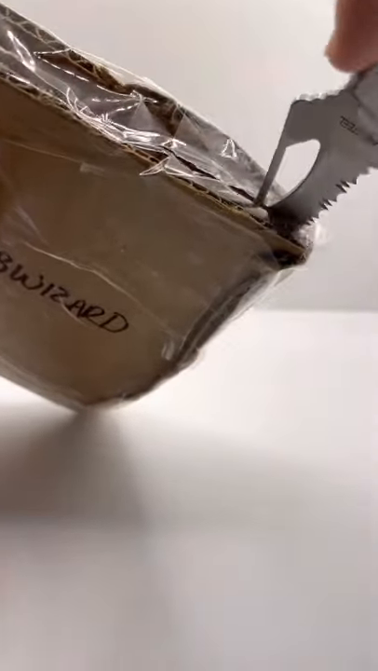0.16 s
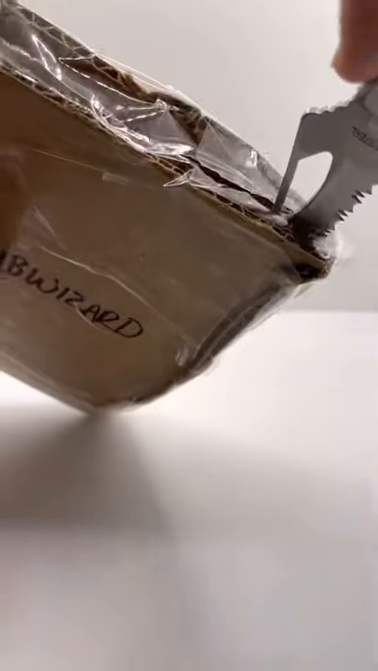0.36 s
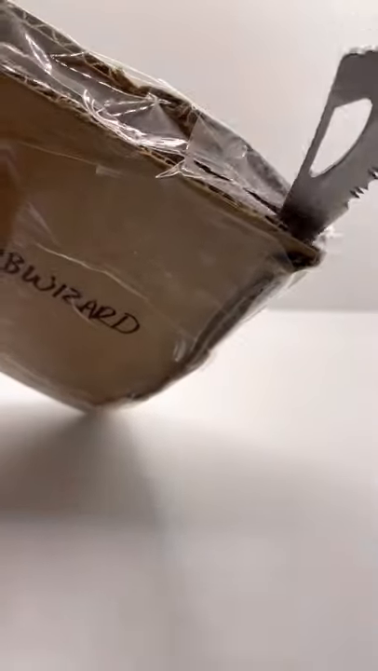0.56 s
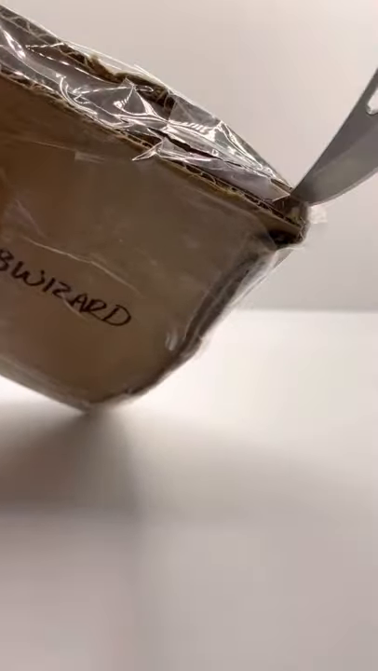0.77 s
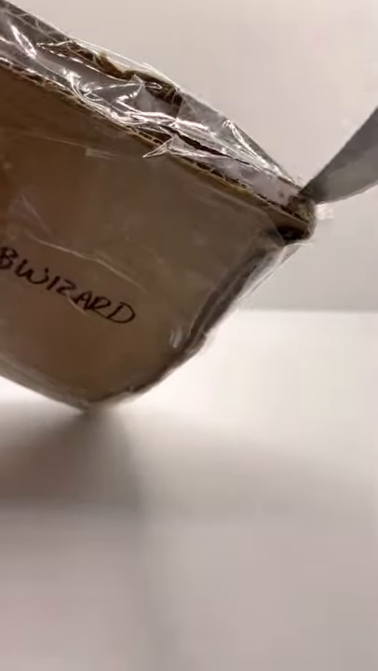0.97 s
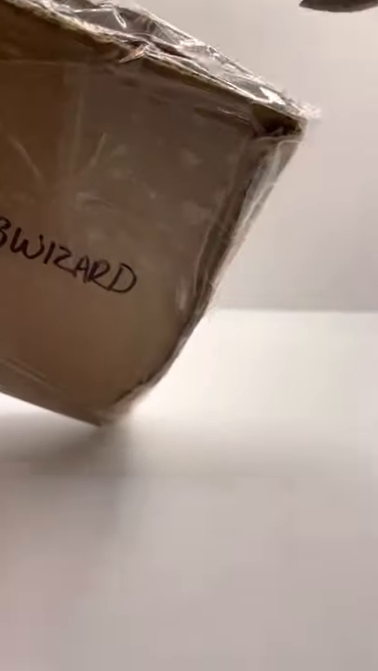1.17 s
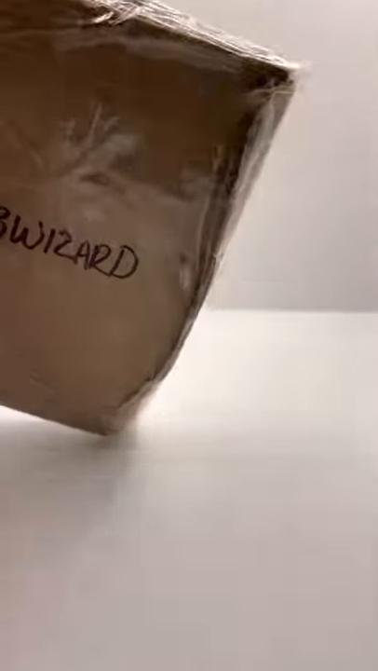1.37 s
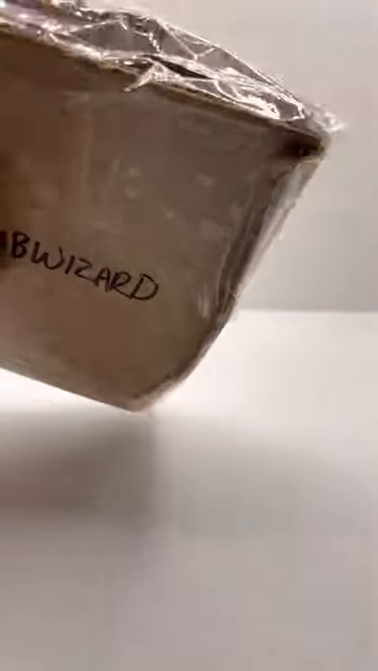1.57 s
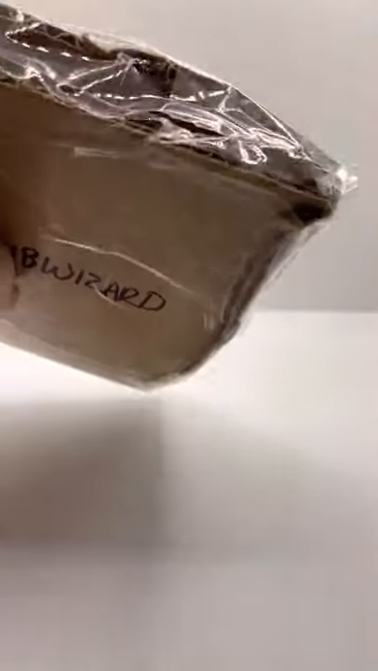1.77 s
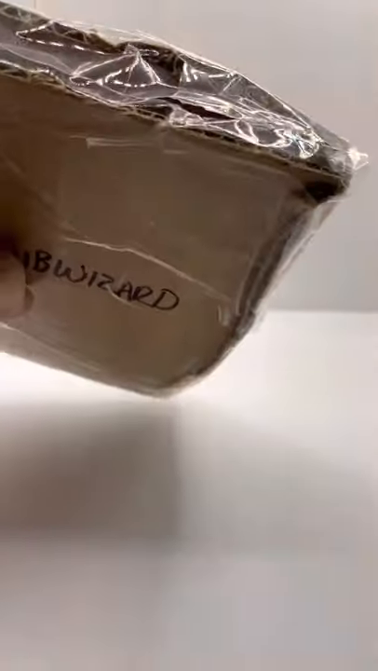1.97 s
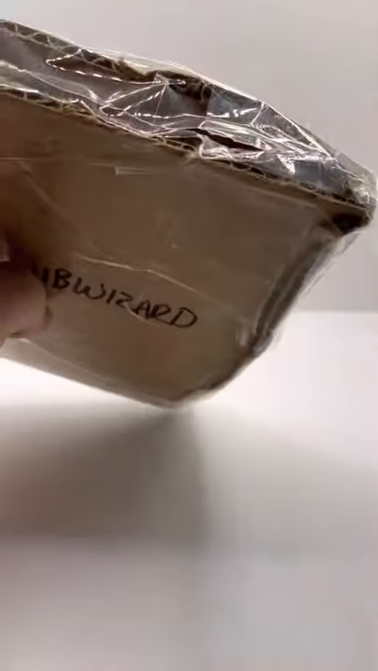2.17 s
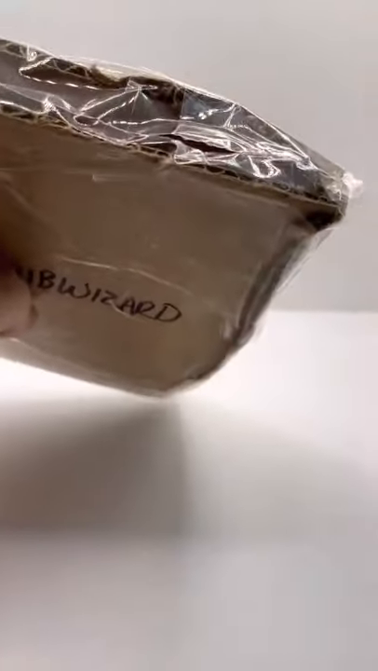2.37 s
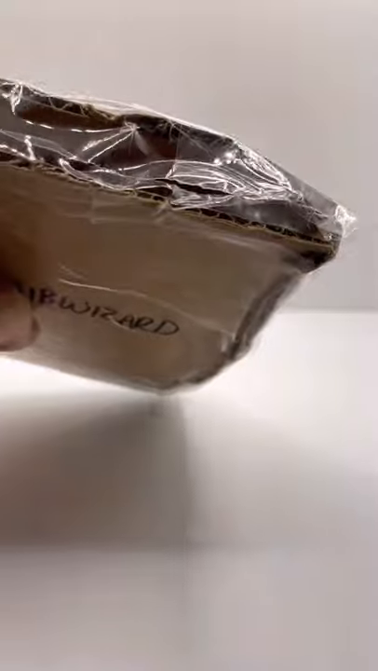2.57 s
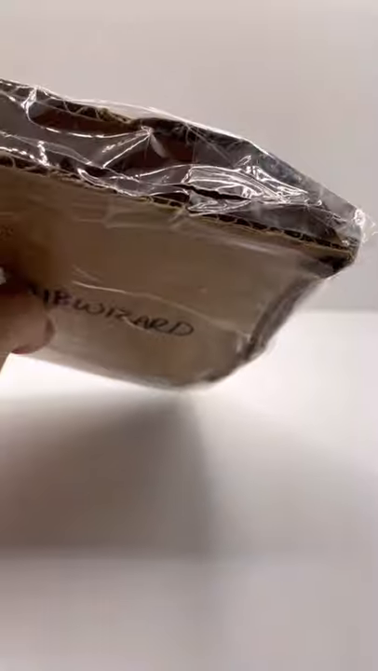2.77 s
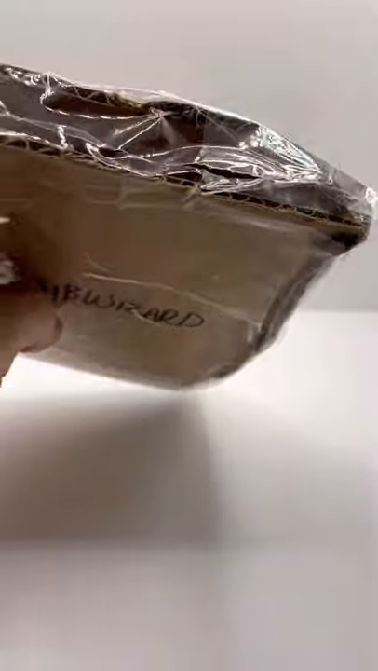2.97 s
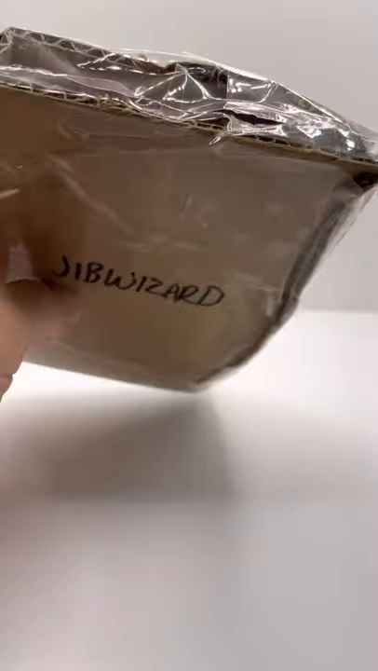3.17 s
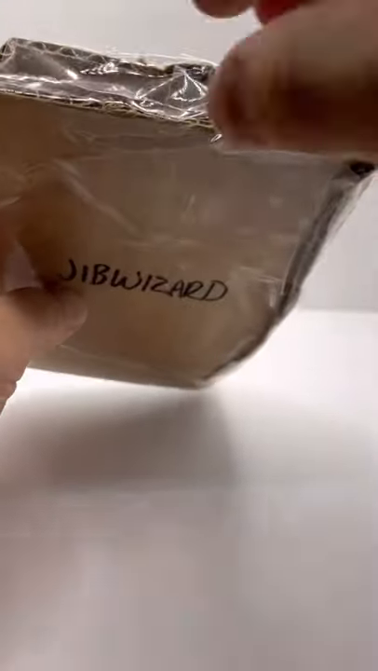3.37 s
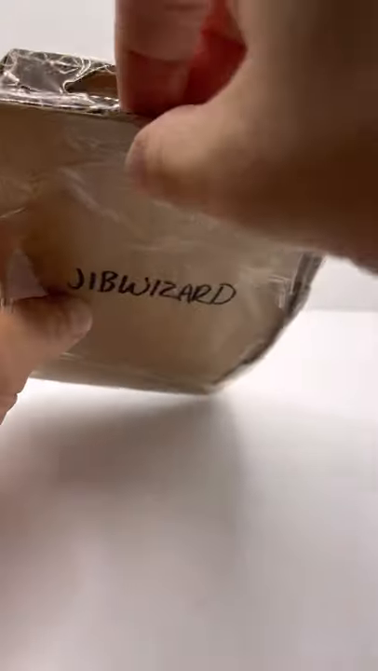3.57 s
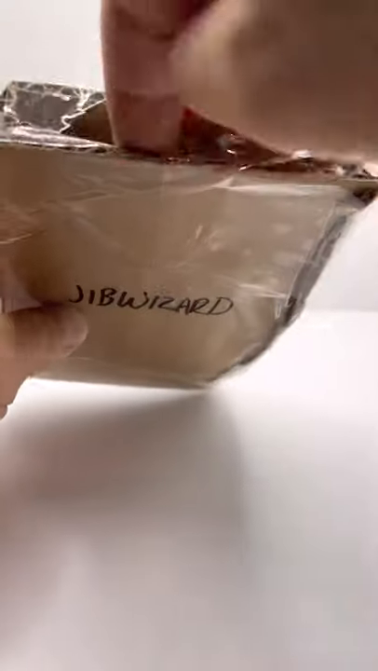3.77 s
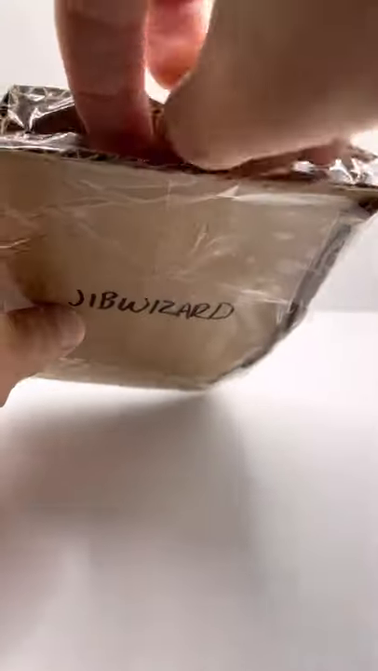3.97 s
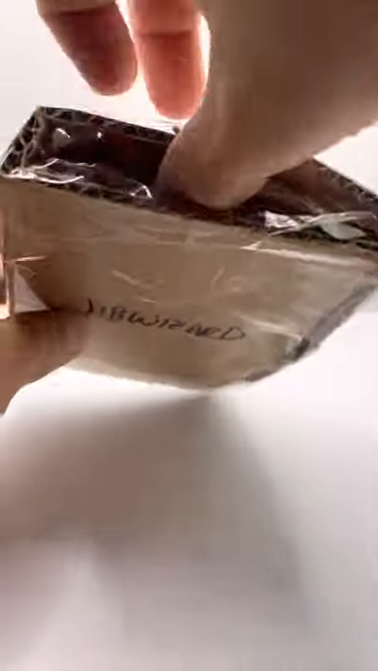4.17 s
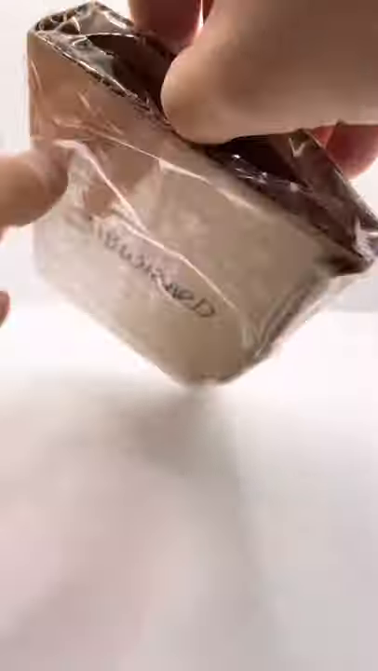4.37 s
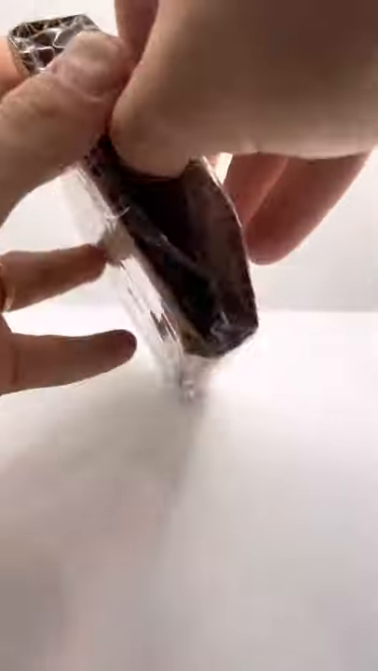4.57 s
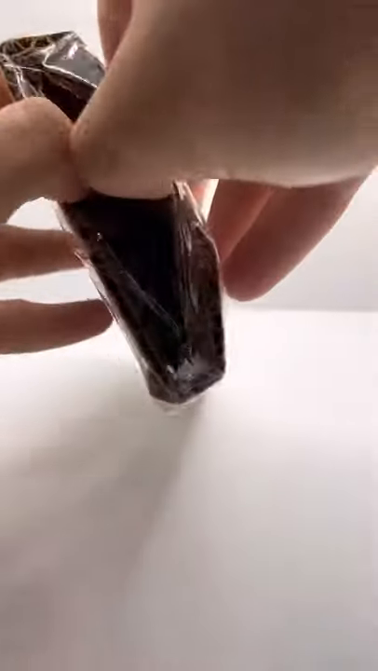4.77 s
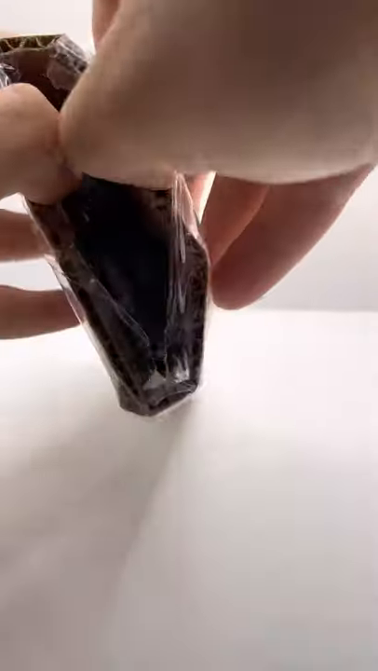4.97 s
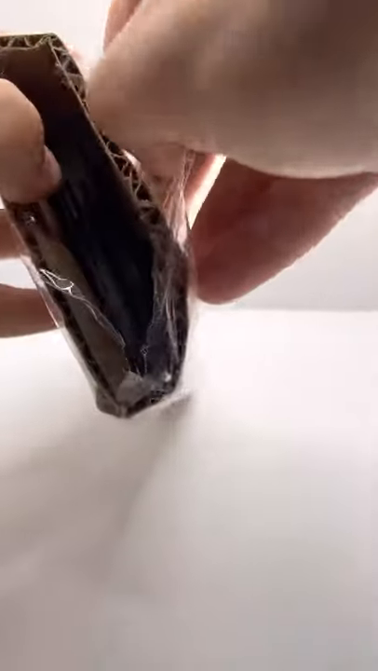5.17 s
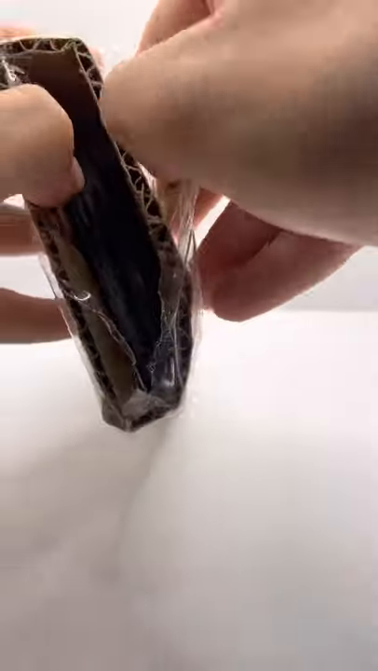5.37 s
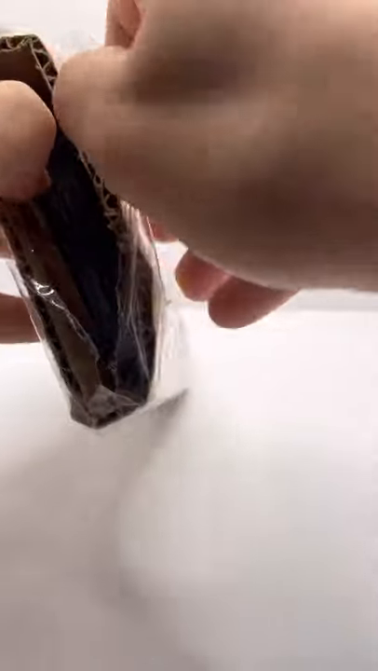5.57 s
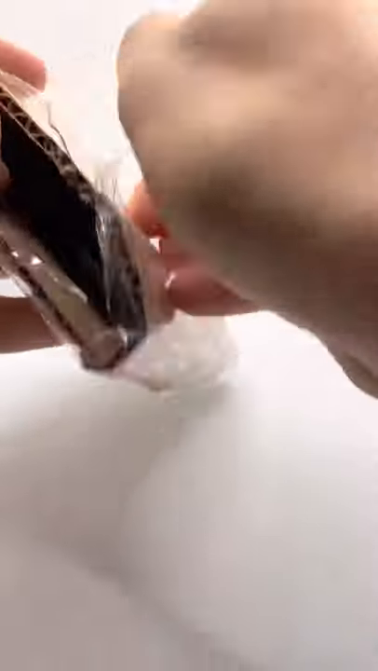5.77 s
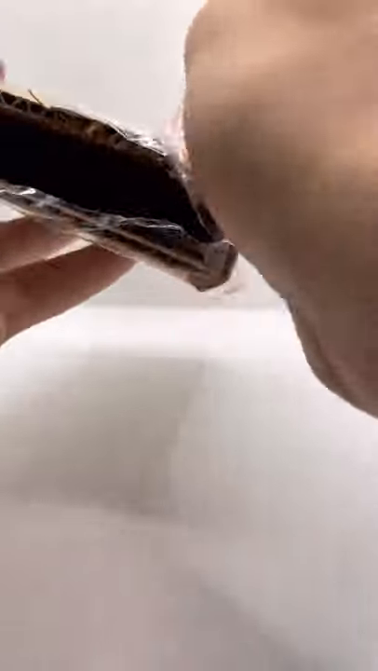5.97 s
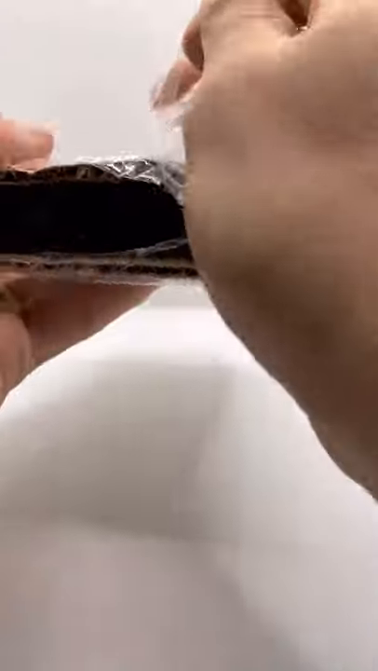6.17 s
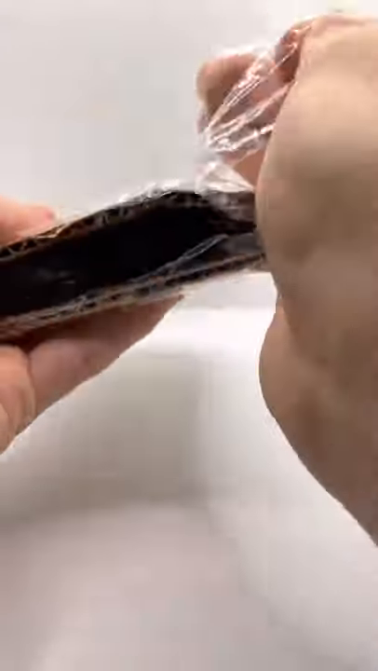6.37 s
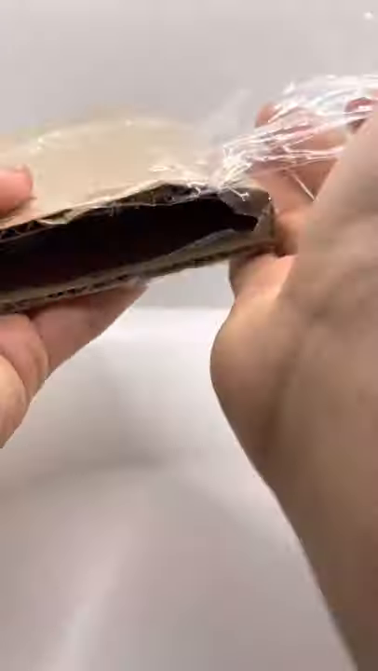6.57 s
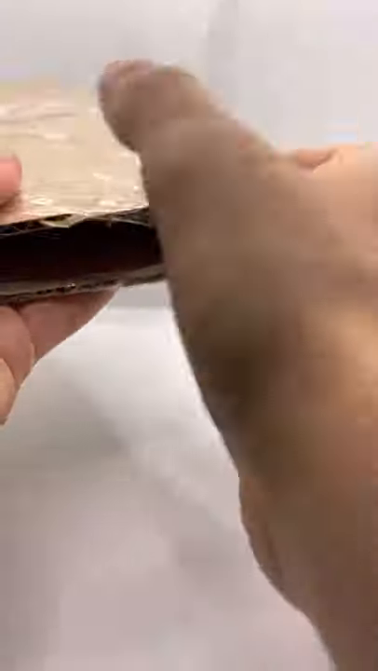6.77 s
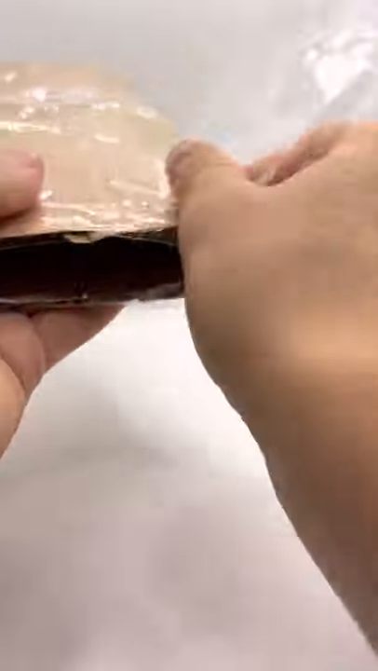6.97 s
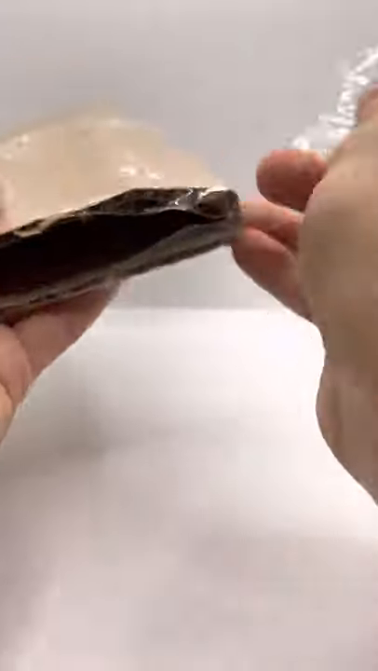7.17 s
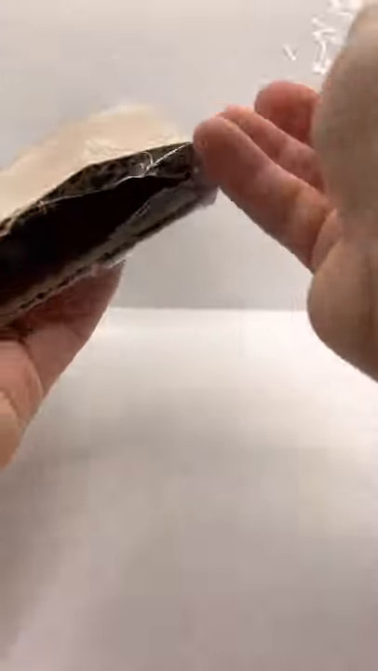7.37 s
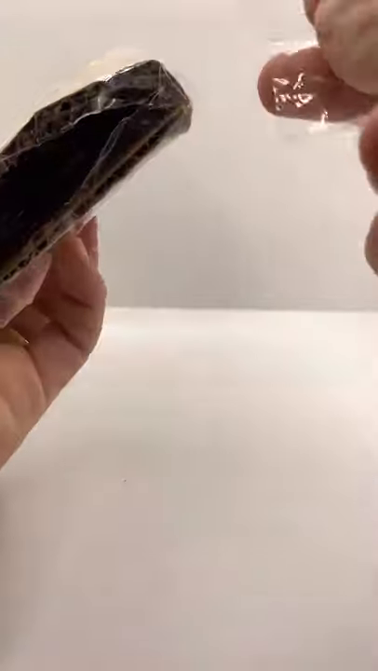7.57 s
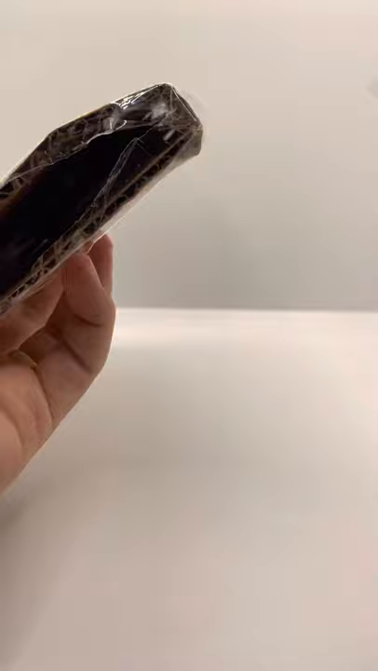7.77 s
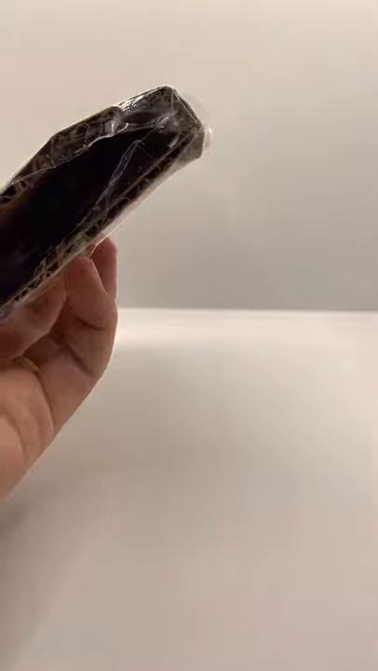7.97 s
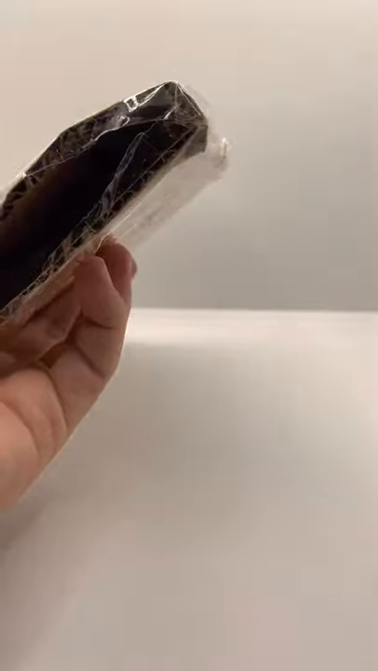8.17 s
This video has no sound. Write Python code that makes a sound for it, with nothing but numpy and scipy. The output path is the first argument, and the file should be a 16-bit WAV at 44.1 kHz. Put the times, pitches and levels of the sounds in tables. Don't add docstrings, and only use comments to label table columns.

```python
import sys
import numpy as np
from scipy import signal
from scipy.fft import rfft, irfft, next_fast_len
from scipy.io import wavfile
from scipy.ndimage import uniform_filter1d, minimum_filter1d

SR = 44100
rng = np.random.default_rng(int(sys.argv[2]) if len(sys.argv) > 2 else 0)


def amplitude_ratio(level_db):
    exponent = np.asarray(level_db, float) / 20
    return 10 ** exponent


def dump(signal):
    limited = np.clip(np.atleast_2d(signal).T, -1, 1)
    pcm = np.round(limited * 32767).astype(np.int16)
    wavfile.write(sys.argv[1], SR, pcm)


N = 362061

# time_s, level_db
RUMBLE = [(0, -42.5), (2, -45.5), (2.6, -45), (3.5, -44), (4.86, -45), (4.9, -66), (5.15, -61.5),
          (5.4, -46), (5.8, -50.5), (5.9, -62), (6.2, -51), (6.4, -60.5), (6.9, -56), (7.4, -58.5),
          (8.21, -56)]
# freq_hz, density_db
FAN = [(15, -50), (25, -23.5), (100, -7.5), (122, -13.5), (137, 4), (155, -6.5), (220, -6), (312, -10),
       (401, -27.5), (480, -16), (530, -32), (590, -21), (700, -48.5), (900, -78)]
# freq_hz, gain_db
AIR = [(250, -31.5), (400, 4), (650, -13), (800, 2), (2000, -19.5), (6000, -28), (11000, -31.5),
       (14000, -56.5)]
# freq_hz, gain_db
FIZZ = [(2500, -27.5), (4500, -6.5), (6500, -6), (9000, -1.5), (11000, -1), (12000, -7), (13200, -20.5),
        (15800, -32), (16500, -76)]
# freq_hz, gain_db
CRACK = [(600, -40), (1400, -2), (2000, 4), (3000, 2), (4300, -0.5), (7000, -9), (13000, -32.5)]
# freq_hz, gain_db
BOARD = [(120, -21.5), (300, -6.5), (600, 2.5), (850, 0.5), (1100, -3), (1500, -3.5), (2600, -35.5),
         (14000, -52)]
# time_s, level_db
RUSTLE = [(0, -53), (.8, -66.5), (1.5, -85), (2.3, -85), (3.2, -83.5), (3.5, -59), (4.3, -55), (5.2, -63.5),
          (5.6, -55.5), (6.1, -70.5), (6.45, -51.5), (6.7, -74.5), (7.2, -68.5), (7.9, -71), (8.02, -86),
          (8.21, -87.5)]
# start_s, end_s, fizz_start_db, fizz_end_db, crack_over_fizz_db
RUBS = [(.168, .208, -33, -33, -6), (.305, .361, -39.5, -54, 2), (.383, .495, -32.5, -41.5, -3),
        (.525, .542, -55, -43.5, 0), (.62, .809, -39, -55.5, 1), (.84, .891, -61, -53, -2),
        (.955, 1.068, -50.5, -43.5, -4), (1.1, 1.269, -58, -56.5, -7.5), (1.26, 1.48, -57.5, -70.5, -6.5),
        (1.49, 1.636, -65, -73.5, -9.5), (2.565, 2.644, -51, -74, -3.5), (2.71, 2.763, -57.5, -54, 10),
        (2.764, 2.873, -41, -71, 15), (3.478, 3.526, -33, -52, 1), (3.52, 3.564, -48.5, -37, 2),
        (3.845, 4.008, -44.5, -42.5, -12.5), (4.03, 4.111, -33, -73, 1.5), (5.38, 5.438, -57.5, -42.5, 1),
        (6.266, 6.348, -15, -26, -12), (6.46, 6.628, -87, -45.5, -4), (6.88, 6.953, -69, -67.5, -8),
        (7.8, 7.94, -59, -40, -10), (8.1, 8.151, -77, -74.5, -6)]
# start_s, end_s, fizz_start_db, fizz_end_db, crack_over_fizz_db
PULLS = [(.075, .106, -32.5, -31.5, -0.5), (.143, .171, -36.5, -52.5, -11.5), (1.91, 1.968, -56, -60.5, 0),
         (3.22, 3.376, -63.5, -58, 1), (3.42, 3.499, -57.5, -57, -1), (4.265, 4.438, -31.5, -53.5, -13),
         (4.53, 4.628, -52, -45, -8), (4.72, 4.762, -54, -30, -4), (4.835, 4.861, -59, -36, 0),
         (4.97, 4.999, -64, -38, -9), (5.6, 5.756, -37.5, -33, -9), (5.757, 5.831, -18, -22.5, -7.5),
         (6.124, 6.159, -15, -38, -5), (6.352, 6.43, -25, -39.5, -5.5), (6.958, 7.073, -49, -40, -6),
         (7.067, 7.108, -23, -30.5, -7), (7.095, 7.124, -36, -21, -8), (7.123, 7.203, -15, -57.5, -7.5),
         (7.615, 7.74, -73, -60, -10)]
# strokes, board_over_crack_db
STROKE_KINDS = [(RUBS, 1), (PULLS, -7.5)]
# start_s, fizz_db, crack_over_fizz_db
TAPE_SNAPS = [(.035, -26.5, -1.5), (.0462, -19.5, -4), (.0524, -12, -6), (1.0994, -26, -26),
              (1.1066, -32, -9), (2.763, -43, 2), (3.6536, -19, -2.5), (4.4116, -16, -12.5),
              (4.5261, -39, 5.5), (5, -9.5, -8.5), (5.0942, -14.5, -2), (5.2682, -15.5, -16),
              (5.7267, -16.5, -12.5), (5.7386, -10.5, -13.5), (5.9316, -60.5, 21), (6.3952, -19.5, -0.5),
              (6.5021, -18.5, -6), (6.5751, -24, -8.5), (6.6052, -20.5, -8.5), (6.8234, -55, 10),
              (6.9721, -20.5, -6.5), (7.0389, -21.5, -11.5), (7.0657, -9.5, -2), (7.108, -14.5, -7.5),
              (7.5644, -62.5, 9), (7.655, -42, -6), (7.7036, -47.5, 5), (7.7998, -41, -17),
              (7.8434, -34, -5), (7.9023, -27, -9)]
# start_s, fizz_db, crack_over_fizz_db
FILM_SNAPS = [(.1935, -23.5, -21), (.618, -28, 5.5), (2.771, -26, 7), (3.8821, -30.5, -1.5),
              (4.0258, -13.5, -24), (4.0473, -15, -20), (4.2632, -17, -8), (4.3659, -42, 10),
              (4.5835, -39, 4.5), (4.651, -9.5, -8), (4.7591, -9.5, -5.5), (5.1234, -20.5, -32),
              (5.2062, -21.5, -15), (5.5976, -11, -12.5), (5.6227, -10.5, -6), (5.656, -10.5, -8),
              (5.7095, -10.5, -20), (6.1217, -14, -4.5), (6.2354, -17, -7), (6.342, -14.5, -4.5),
              (6.4587, -16, -16), (7.1188, -4.5, -18), (7.3529, -49, 5), (7.4086, -34, -17),
              (7.614, -57, 10.5), (7.6698, -33.5, -12), (7.8211, -29.5, -31), (7.8627, -36.5, 3.5),
              (7.87, -20.5, -21)]
# start_s, fizz_db, crack_over_fizz_db
WRAP_SNAPS = [(.0723, -6.5, -4.5), (.106, -20, -4), (.3968, -32, -2), (.5556, -17, -13.5),
              (.6383, -21.5, -15), (.9852, -29, 0), (1.2382, -41.5, -15), (1.5224, -50, -7),
              (3.5167, -28, 9), (3.5551, -8.5, -41), (3.7434, -26.5, -3), (4.066, -16.5, -13),
              (4.2926, -14.5, -12), (4.3488, -29, -28), (4.6105, -28, -11), (4.8605, -13, -2.5),
              (4.9367, -36, -11), (5.1556, -8.5, -16.5), (5.4066, -31.5, 4), (5.6712, -6, -9.5),
              (5.7562, -6.5, -14.5), (6.2636, -3.5, -17.5), (6.2991, -15, -28.5), (6.3303, -13.5, -20),
              (6.4138, -19, -18), (6.4338, -19.5, -31.5), (6.5231, -19, -10.5), (6.99, -25.5, -10),
              (7.4714, -38, -5.5), (7.637, -44.5, -2)]
# start_s, fizz_db, crack_over_fizz_db
BOARD_SNAPS = [(.308, -30, -17), (.85, -50, 3.5), (.9657, -29.5, -4), (2.1564, -67, 14.5),
               (3.034, -50.5, 11.5), (3.5464, -19.5, -11.5), (3.687, -45.5, 13.5), (3.8745, -25.5, -5.5),
               (3.922, -36.5, 0.5), (3.9769, -31.5, -2), (4.0394, -14, -39), (4.0911, -11, -16.5),
               (4.2275, -23.5, -24), (5.5054, -35.5, -30), (5.5402, -22.5, -22), (5.6485, -32.5, 4),
               (6.6373, -26, -24), (6.7167, -57.5, 10), (7.006, -26, -16.5), (7.21, -37, -18),
               (7.2541, -23.5, -22.5), (7.2933, -40, -8), (7.3884, -42, -16), (7.9286, -25.5, -16)]
# snaps, board_over_crack_db, ring_t60_s
SNAP_KINDS = [
    (TAPE_SNAPS, -15, 0.037),
    (FILM_SNAPS, -7.5, 0.031),
    (WRAP_SNAPS, -.5, 0.03),
    (BOARD_SNAPS, 7.4, 0.04),
]
# start_s, length_s, fizz_db, crack_over_fizz_db
CLUMPS = [(0.035, 0.013, -35, -2), (0.093, .035, -32.5, -2.5), (0.31, .022, -39, -9),
          (0.392, 0.0223, -29.5, -3), (2.774, 0.016, -38, 7), (3.552, 0.0075, -17.5, -29.5),
          (4.074, 0.013, -27.5, -1.5), (4.248, 0.025, -41, 1.5), (4.261, 0.017, -17.5, -3.5),
          (4.282, 0.019, -37, 6.5), (4.365, 0.013, -60, 20), (4.581, 0.016, -57.5, 15.5),
          (4.74, 0.017, -52, 9.5), (4.851, 0.017, -47, 6), (5.41, 0.021, -49, 9),
          (5.624, 0.013, -21.5, -15.5), (5.653, 0.0088, -16.5, -8.5), (5.672, .013, -16, -8.5),
          (5.713, 0.0063, -19, -19.5), (5.741, 0.01, -23, -11.5), (5.756, .018, -17, -7),
          (5.778, 0.015, -22, 0), (5.798, .012, -20.5, -10), (6.107, .013, -52.5, 5.5),
          (6.118, 0.02, -13.5, -7), (6.262, 0.013, -14.5, -10), (6.298, 0.0072, -18.5, -2),
          (6.305, 0.019, -19.5, -2), (6.329, 0.011, -14, -6), (6.339, .013, -15, -10.5),
          (6.369, .009, -25, -9.5), (6.883, .014, -67, 3.5), (6.923, .01, -68, 7), (7.064, 0.026, -17, -12),
          (7.1, 0.015, -27.5, -4.5), (7.112, 0.012, -17, -10), (7.141, .014, -27.5, -10),
          (7.156, .01, -27.5, -8.5), (7.297, 0.022, -53.5, 3), (7.708, 0.021, -57, 3.5),
          (7.941, 0.032, -55.5, -4)]
# start_s, level_db, pitch_hz, t60_s
KNOCKS = [
    (0.087, -17.5, 297, 0.046),
    (0.617, -36, 286, 0.18),
    (2.783, -20, 273.6, 0.21),
    (4.093, -24, 320, 0.03),
    (4.26, -40, 298.5, 0.21),
    (4.862, -15, 251, 0.017),
    (5.676, -35, 320, 0.038),
    (6.121, -20, 193.6, 0.055),
    (6.266, -15.5, 210.6, 0.026),
    (6.719, -35, 240, 0.084),
]
# start_s, level_db, pitch_hz, t60_s
THUDS = [
    (0.127, -37.5, 80.7, 0.16),
    (2.794, -23.5, 87, 0.084),
    (5.817, -43.5, 75, 0.11),
    (6.279, -39, 45.4, 0.15),
    (6.735, -37, 75, 0.11),
    (6.98, -48, 69.8, 0.096),
    (7.946, -29.5, 60, 0.078),
]
# start_s, level_db, pitch_hz, t60_s
RINGS = [(0.617, -21.5, 888, 0.024), (2.567, -46, 922, 0.19), (2.57, -57, 2800, 0.12),
         (2.71, -41.5, 980, 0.12), (2.715, -51, 2800, .12), (3.517, -30.5, 904, 0.062),
         (3.694, -31, 1254, 0.029), (3.981, -23.5, 1170, 0.026), (4.262, -28.5, 1890, 0.11),
         (5.001, -23, 1300, 0.033), (5.095, -21.5, 2300, 0.027), (5.6485, -23, 1300, .025),
         (5.673, -18, 1720, 0.023), (6.121, -13.5, 1495, 0.05), (6.262, -18.5, 1772, 0.052),
         (7.9025, -32, 3500, 0.032)]
# start_s, level_db, pitch_hz, t60_s
HIGH_RINGS = [
    (1.0988, -23, 11100, 0.02),
    (1.1087, -22.5, 11000, 0.014),
    (3.5543, -13.5, 11960, 0.02),
    (4.09, -19.5, 11200, 0.015),
]
# start_s, fizz_db, crack_over_fizz_db
TICKS = [(0.1873, -35, -11), (0.4151, -40, 4), (0.4265, -26, 1), (0.6598, -40.5, 9), (0.7573, -46, 10),
         (0.778, -50, 11), (0.7997, -56, -8), (1.5343, -61, 5.5), (1.9423, -55.5, 7.5), (3.2998, -55, -6),
         (3.533, -41, 8), (3.636, -39, -18), (3.6684, -49, -5), (3.8085, -60, -4), (3.856, -38, -5),
         (3.9134, -45, -12), (3.9535, -39, -4.5), (4.1688, -56, -12), (4.3202, -36, -15),
         (4.3332, -38, -10), (4.3853, -43, -15), (4.4, -31, -17), (4.563, -35, -18), (4.632, -43, -13),
         (4.645, -40, -1), (4.7038, -40, -7), (4.725, -36, -8), (4.8213, -34, -7), (4.8393, -41, -6),
         (4.9186, -49, -11), (4.9715, -48, -12), (4.982, -42, -3), (4.99, -37, -7), (5.2733, -23, -16.5),
         (5.378, -42, -4), (5.4908, -48, -9), (5.496, -40, -14), (5.615, -22, -10.5), (5.8402, -13.5, -7),
         (6.173, -33, -6), (6.209, -48, -12), (6.2219, -49, -17), (6.2787, -19, -8), (6.285, -18, -4.5),
         (6.481, -34, -14), (6.6125, -26, -2), (6.6287, -24, -20), (7.0004, -48, 8), (7.0233, -45, -11.5),
         (7.036, -30, -13.5), (7.0517, -34, -1.5), (7.2233, -42, -3), (7.4194, -51, -20), (7.4975, -47, 1),
         (7.5279, -58, 11.5), (7.6294, -51, 1), (7.69, -53, -10), (7.7249, -54, 8), (7.8345, -49, -1),
         (7.89, -46, 1)]
# freq_hz, likeness_0_to_1
SAME = [(60, .9995), (150, .998), (300, .99), (600, .93), (1100, .4), (1500, .93), (2100, .93), (3000, .35),
        (4300, .65), (4900, .9), (5800, .96), (7400, .85), (9000, .997), (13000, .96), (14000, .4),
        (15500, .95)]
# freq_hz, lead_rad
LEAD = [(1400, 0), (2500, .5), (4000, .8), (4900, 3.1), (5700, 6.2), (6300, 6.5), (8300, 9.1), (9600, 9.7),
        (11900, 12.3), (13700, 12.8), (14700, 15.5), (16000, 15.7)]
DROPOUT_BANDS_HZ = [4000, 4750, 5150, 6900, 8300, 9600, 11000, 12400, 13200, 14000, 15000, 22050]


def evened(x):
    return x / np.sqrt(np.mean(x ** 2) + 1e-20)


def read(points, hz):
    table_hz, value = np.transpose(points)
    return np.interp(np.log(hz + 1), np.log(table_hz + 1), value)


def level_curve_db(points):
    time_s, level_db = np.transpose(points)
    return np.interp(np.arange(N) / SR, time_s, level_db)


def coloured(x, spectrum):
    size = 8192
    gain_db = read(spectrum, abs(np.fft.fftfreq(size, 1 / SR)))
    response = np.exp(np.conj(signal.hilbert(np.log(amplitude_ratio(gain_db)))))
    taps = np.fft.ifft(response).real[:size // 2]
    return signal.oaconvolve(x, taps[None] / np.linalg.norm(taps))[:, :N]


def room():
    fan = evened(coloured(rng.standard_normal((2, N)), FAN))
    air = evened(coloured(rng.standard_normal((2, N)), AIR))
    return amplitude_ratio(level_curve_db(RUMBLE)) * (fan + amplitude_ratio(-26.5) * air)


def dying(t, t60, tail_db, tail_t60):
    rise = 1 - np.exp(-t / 0.0012)
    ring = amplitude_ratio(-60 * t / t60) ** 2
    tail = amplitude_ratio(tail_db - 60 * t / tail_t60) ** 2
    return rise * (ring + tail)


def crinkle(per_s, spread_db, t60):
    size_db = spread_db * np.minimum(rng.exponential(1, N), 4)
    releases = amplitude_ratio(size_db) ** 2 * (rng.random(N) < per_s / SR)
    burst = dying(np.arange(2000) / SR, t60, tail_db=-18, tail_t60=.04)
    power = signal.oaconvolve(releases, burst)[:N].clip(0)
    return power / power.mean()


def panels(patchy_db):
    real, imag, patches = rng.standard_normal((3, 2, N // 128 + 5, 257))
    patches = uniform_filter1d(patches[0], size=14, axis=0)
    patches = evened(uniform_filter1d(patches, size=2, axis=1))
    z = (real + 1j * imag) * amplitude_ratio(patchy_db * patches)
    return evened(signal.istft(z.swapaxes(1, 2), nperseg=512, noverlap=384)[1][:, :N])


def film():
    creases = .45 + .55 * crinkle(per_s=300, spread_db=3.1, t60=.018)
    grain = 0.5 + 0.5 * crinkle(per_s=6600, spread_db=1.5, t60=0.0007)
    sudden = (snaps() + ticks()) * np.sqrt(grain)
    drive = np.sqrt(sudden + clumps() * grain + strokes() * creases * grain)
    out = np.zeros((2, N))
    for part_drive, spectrum in zip(drive, [FIZZ, CRACK, BOARD]):
        out += coloured(part_drive * panels(patchy_db=3.8), spectrum)
    return out


def strokes():
    t = np.arange(N) / SR
    power = amplitude_ratio(level_curve_db(RUSTLE) + np.array([[0], [-4], [-7]])) ** 2
    for rows, board_db in STROKE_KINDS:
        for start_s, end_s, first_db, last_db, crack_db in rows:
            stop_db = np.clip(28 - .8 * (first_db - last_db), 2, 21)
            times_s = [start_s - .004, start_s, end_s, end_s + .018, end_s + .15]
            levels_db = [first_db - 40, first_db, last_db, last_db - stop_db, last_db - stop_db - 32]
            near = slice(*np.searchsorted(t, [times_s[0], times_s[-1]]))
            fizz_db = np.interp(t[near], times_s, levels_db)
            power[:, near] += amplitude_ratio(fizz_db + np.array([[0], [crack_db], [crack_db + board_db]])) ** 2
    return power


def snaps():
    power, t = np.zeros((3, N + 8000)), np.arange(8000) / SR
    slower, trim_db = [1, 1.51, 1.5], [-2.5, -6.5, -5]
    rise_s = [.0004, .0009, .0025]
    for rows, board_db, t60 in SNAP_KINDS:
        for part, share_db in enumerate([0, 0, board_db]):
            release = amplitude_ratio(7 - 60 * t / (0.0068 * slower[part])) ** 2
            ring = dying(t, t60 * slower[part], tail_db=-25, tail_t60=0.21)
            burst = (release + ring) * np.minimum(t / rise_s[part], 1) ** 2
            for start_s, fizz_db, crack_db in rows:
                level_db = fizz_db + (part > 0) * crack_db + share_db + trim_db[part]
                power[part, round(start_s * SR):][:len(t)] += amplitude_ratio(level_db) ** 2 * burst
    return power[:, :N]


def clumps():
    power = np.zeros((3, N))
    skew, board_db = .7, -6.5
    for start_s, length_s, fizz_db, crack_db in CLUMPS:
        phase = np.linspace(0, 1, round(length_s * SR)) ** skew
        arch = np.sin(np.pi * phase) ** 2
        level_db = fizz_db + np.array([[0], [crack_db], [crack_db + board_db]])
        power[:, round(start_s * SR):][:, :len(arch)] += arch * amplitude_ratio(level_db) ** 2
    return power


def clicks():
    click_db, click_lag_s, echo_s, echo_db = 0.5, .0005, .0016, -4
    kicks = np.zeros((2, 2, N + 400))
    for rows, _, _ in SNAP_KINDS:
        for start_s, fizz_db, crack_db in rows:
            sign, apart, luck = rng.uniform(-1, 1, size=3)
            bounce = (echo_s * (1 + 0.28 * luck), echo_db + 5.4 * luck)
            for lag_s, path_db in [(0, 0), bounce]:
                level_db = click_db + path_db + fizz_db + np.array([0, crack_db])
                size = np.sign(sign) * amplitude_ratio(level_db)
                kicks[:, :, round((start_s + click_lag_s + lag_s) * SR)] += np.outer(size, [1, apart])
    return coloured(kicks[0], FIZZ) + coloured(kicks[1], CRACK)


def knocks():
    out, t = np.zeros(N + 16000), np.arange(16000) / SR
    mode_ratio_height = [(1, 1), (1.06, .6), (.88, 0.56), (1.17, 0.18)]
    for start_s, level_db, pitch_hz, t60 in KNOCKS + THUDS + RINGS + HIGH_RINGS:
        modes = np.zeros(len(t))
        for ratio, height in mode_ratio_height:
            modes += height * np.sin(2 * np.pi * (ratio * pitch_hz * t + rng.random()))
        rise = 1 - np.exp(-t * pitch_hz / 0.6)
        out[round(start_s * SR):][:len(t)] += amplitude_ratio(level_db + 0.5 - 60 * t / t60) * rise * modes
    return out[:N]


def ticks():
    power, t = np.zeros((3, N + 4000)), np.arange(4000) / SR
    burst = dying(t, t60=0.019, tail_db=-18, tail_t60=0.061)
    for start_s, fizz_db, crack_db in TICKS:
        level_db = -0.5 + fizz_db + np.array([[0], [crack_db], [crack_db - 5]])
        power[:, round(start_s * SR):][:, :len(t)] += burst * amplitude_ratio(level_db) ** 2
    return power[:, :N]


def scene():
    return film() + clicks() + knocks() + room()


def treble_dropouts(ports, below_db, attack_db):
    mid_side = np.array([ports.sum(0), ports[0] - ports[1]]) / 2
    hz, _, z = signal.stft(mid_side, SR, nperseg=512, noverlap=384)
    band = np.searchsorted(DROPOUT_BANDS_HZ, hz) - 1
    level = np.array([(abs(z[:, band == b]) ** 2).mean(1) for b in range(band.max() + 1)])
    airy_db = 10 * (np.array(DROPOUT_BANDS_HZ[:-1]) > 13000)[:, None, None]
    loudest = level.max((0, 1))
    before = np.roll(uniform_filter1d(loudest, size=5), 4)
    attack = loudest > amplitude_ratio(attack_db) ** 2 * before
    steady = minimum_filter1d(1. * ~attack, size=3)
    threshold = uniform_filter1d(loudest, size=7) * amplitude_ratio(below_db - airy_db) ** 2
    shut = uniform_filter1d(level, size=7) < threshold
    z = z * (1 - .99 * (shut * steady)[band].swapaxes(0, 1) * (band >= 0)[:, None])
    z = z * (hz < 16300)[:, None]
    mid, side = signal.istft(z, nperseg=512, noverlap=384)[1][:, :N]
    return np.array([mid + side, mid - side])


def band_limit(x):
    return signal.sosfilt(signal.butter(12, 16510, fs=SR, output="sos"), x)


def record(dry):
    size = next_fast_len(N + SR)
    hz = np.fft.rfftfreq(size, 1 / SR)
    shared, apart = rfft(dry, size)
    same = read(SAME, hz)
    turn = np.exp(.5j * np.interp(hz, *np.transpose(LEAD)))
    shared = shared * np.sqrt((1 + same) / 2)
    apart = apart * np.sqrt((1 - same) / 2)
    ports = irfft(np.array([(shared + apart) * turn, (shared - apart) / turn]), size)[:, :N]
    ports = .78 * np.tanh(ports / .78)
    ports = treble_dropouts(ports, below_db=-17, attack_db=11)
    return band_limit(ports)


dry = scene()
out = record(dry)
dump(out)
```